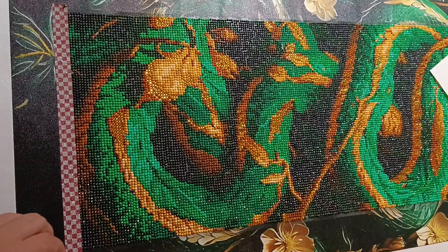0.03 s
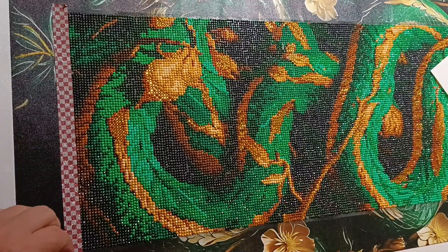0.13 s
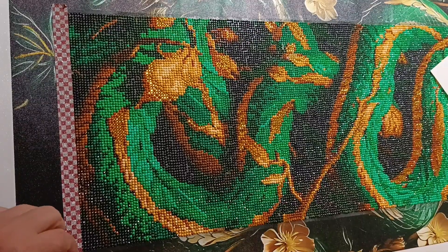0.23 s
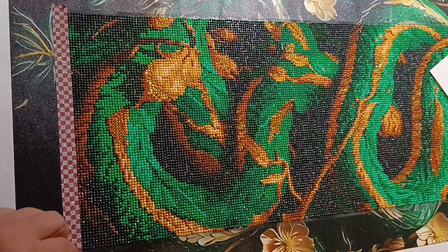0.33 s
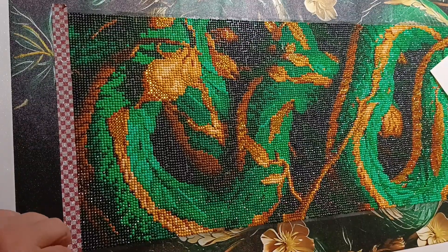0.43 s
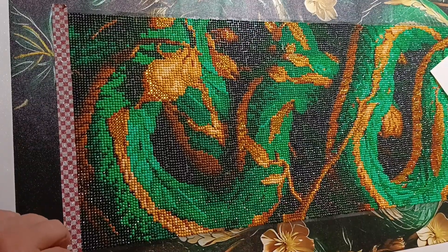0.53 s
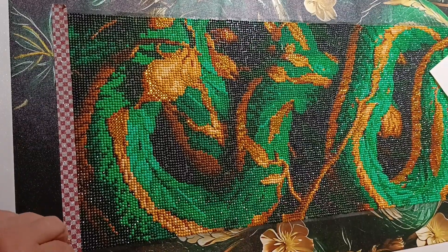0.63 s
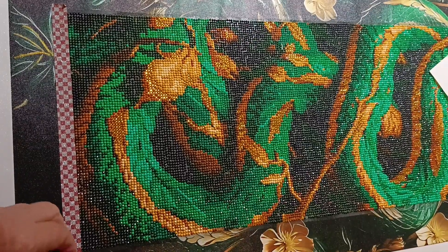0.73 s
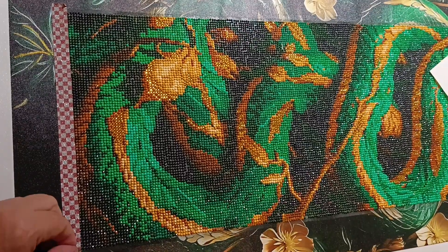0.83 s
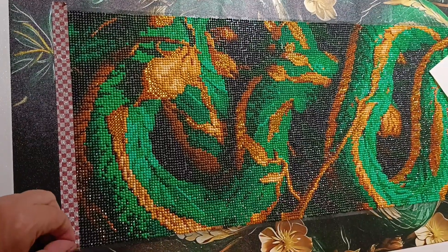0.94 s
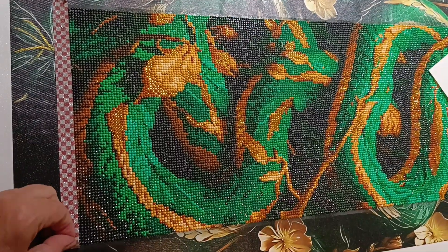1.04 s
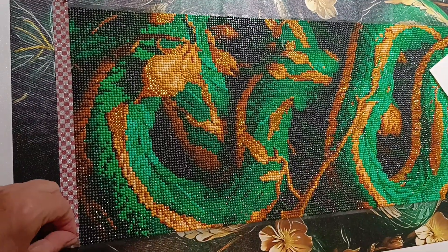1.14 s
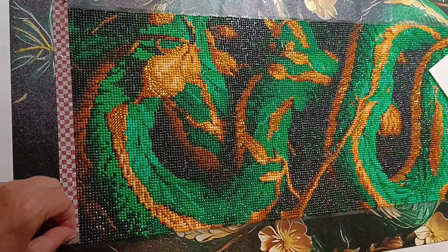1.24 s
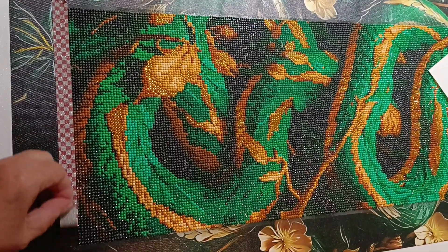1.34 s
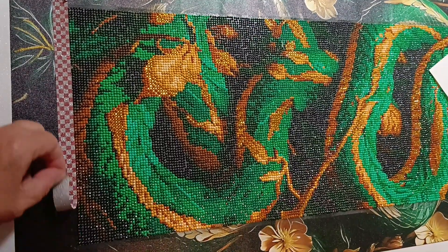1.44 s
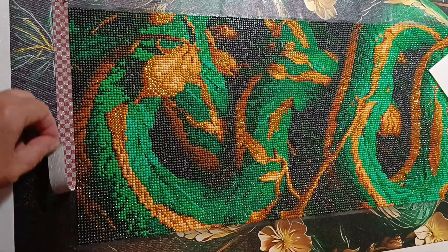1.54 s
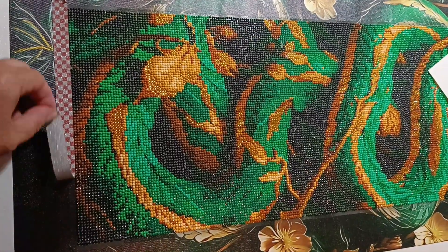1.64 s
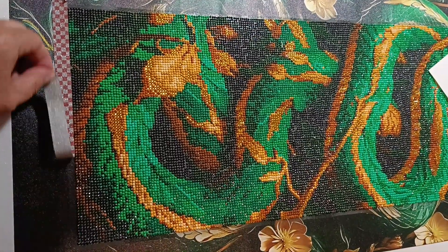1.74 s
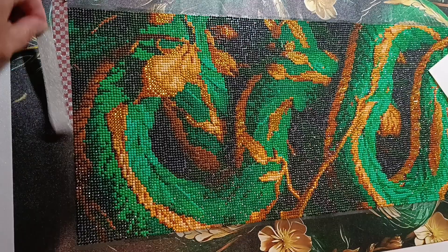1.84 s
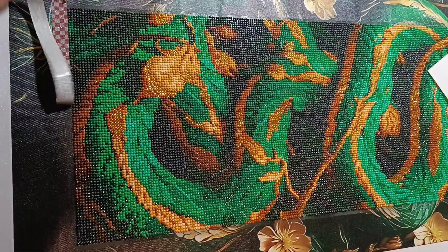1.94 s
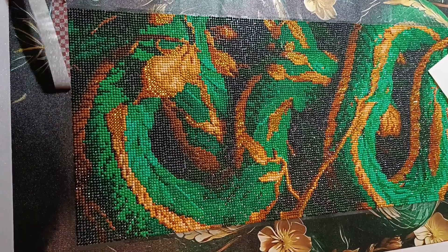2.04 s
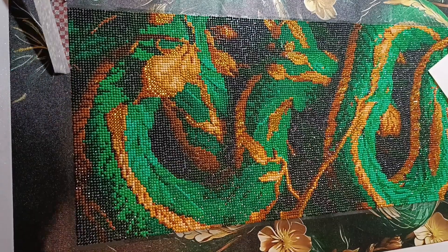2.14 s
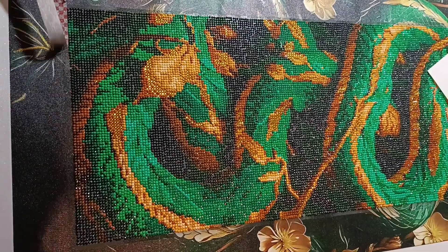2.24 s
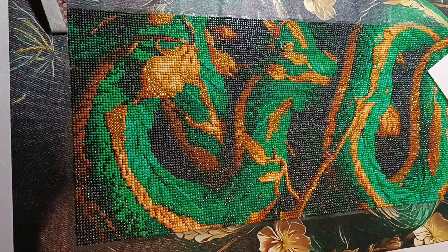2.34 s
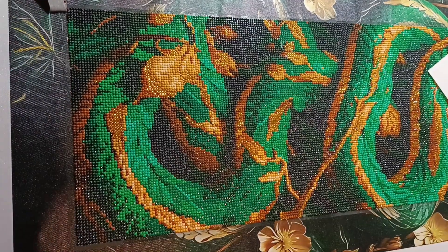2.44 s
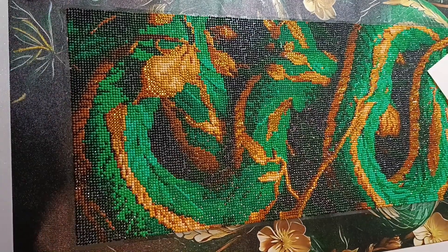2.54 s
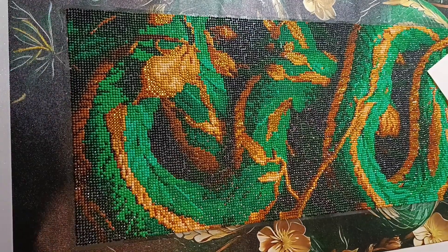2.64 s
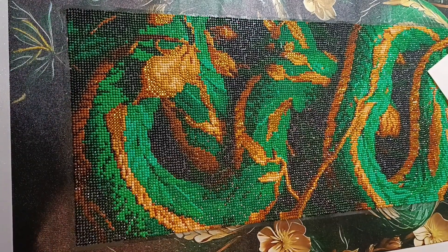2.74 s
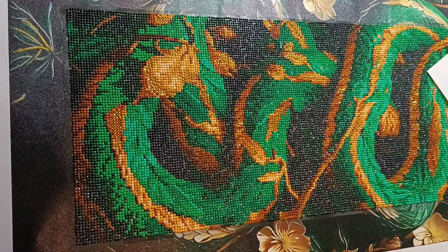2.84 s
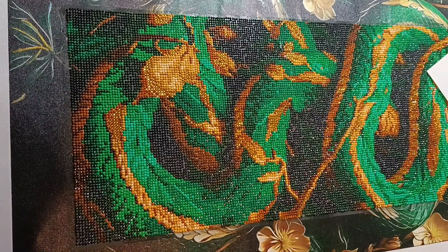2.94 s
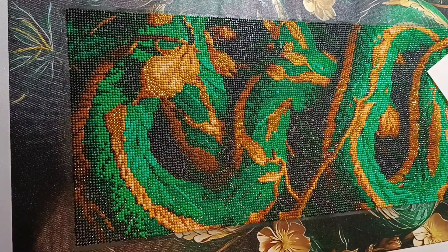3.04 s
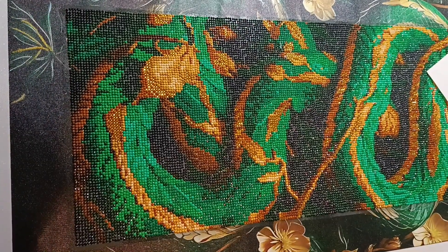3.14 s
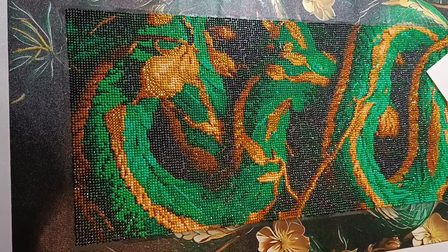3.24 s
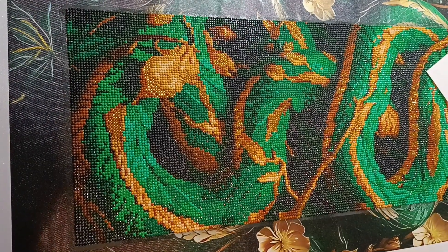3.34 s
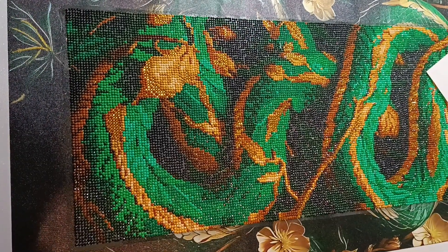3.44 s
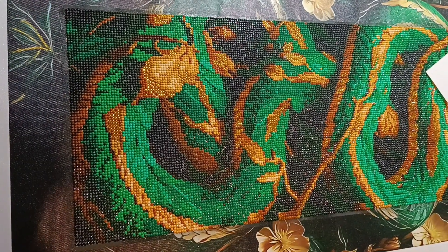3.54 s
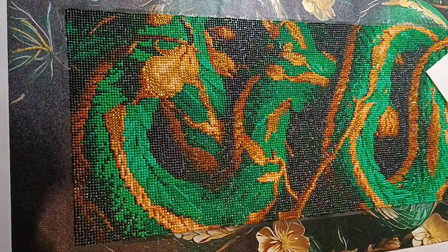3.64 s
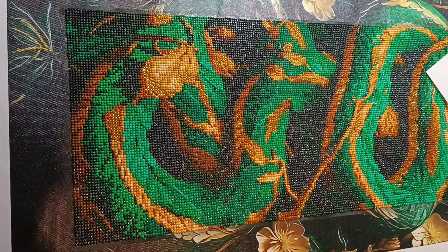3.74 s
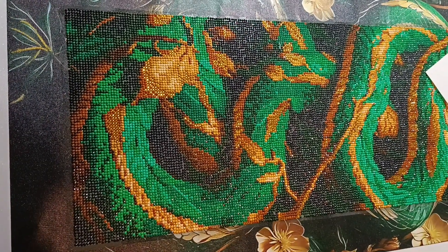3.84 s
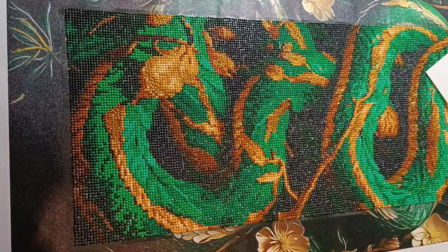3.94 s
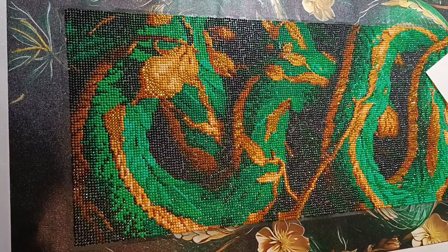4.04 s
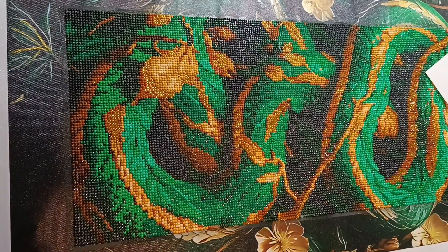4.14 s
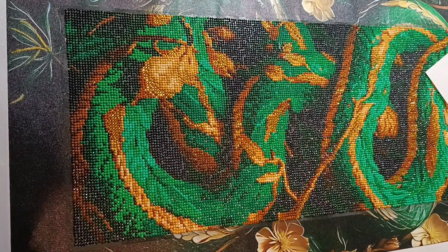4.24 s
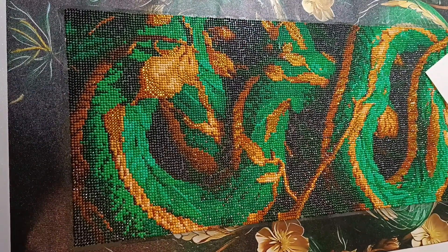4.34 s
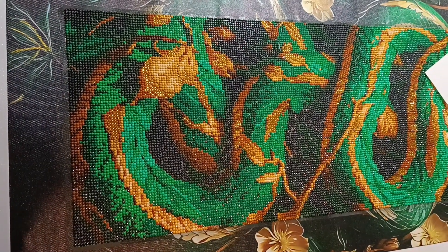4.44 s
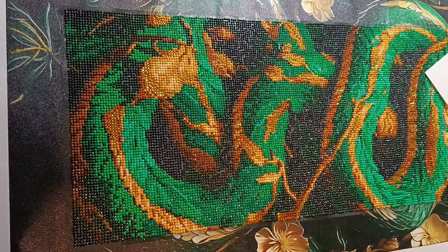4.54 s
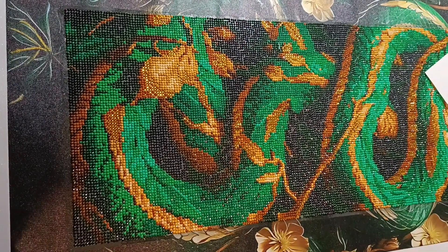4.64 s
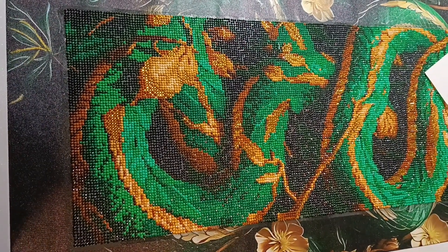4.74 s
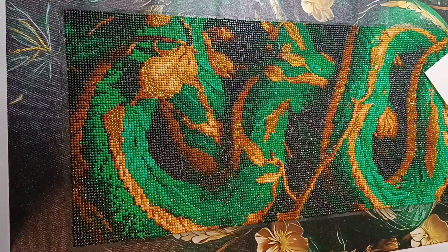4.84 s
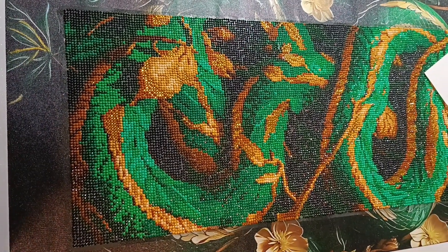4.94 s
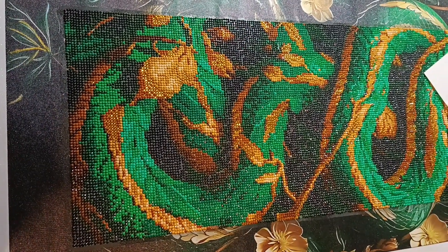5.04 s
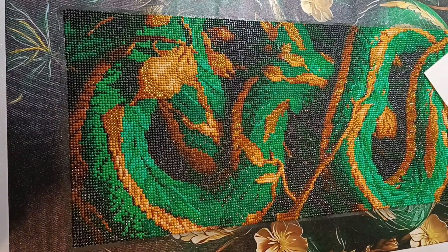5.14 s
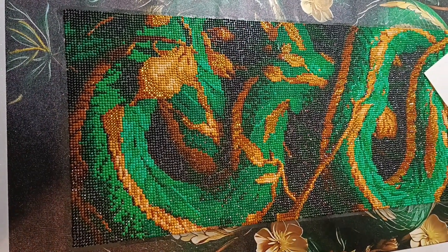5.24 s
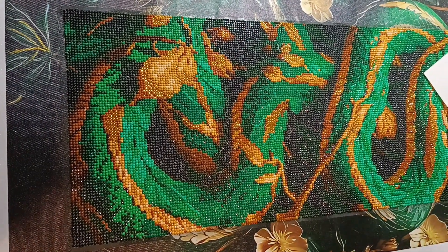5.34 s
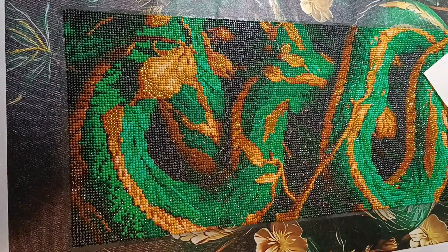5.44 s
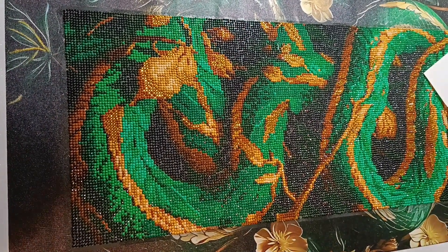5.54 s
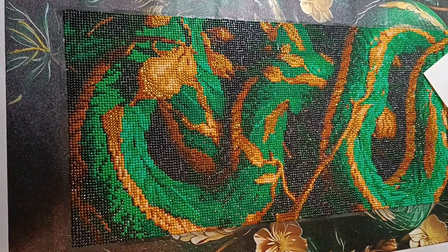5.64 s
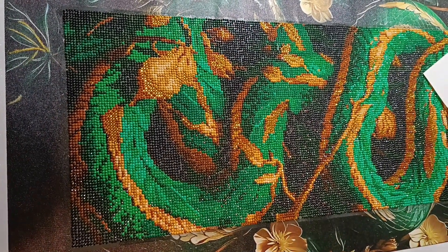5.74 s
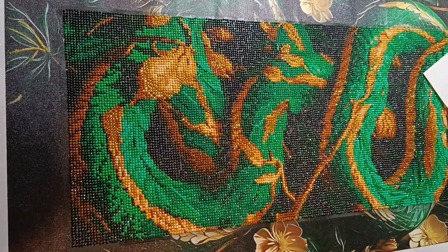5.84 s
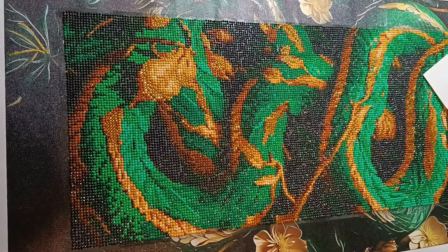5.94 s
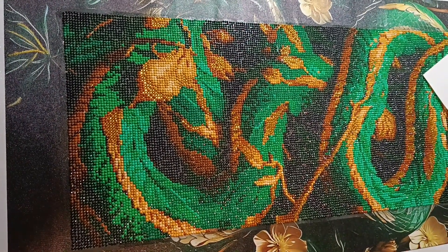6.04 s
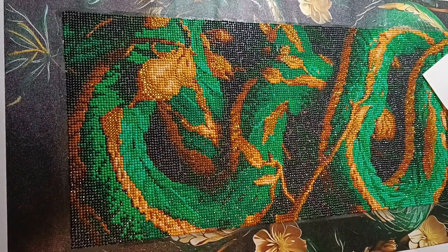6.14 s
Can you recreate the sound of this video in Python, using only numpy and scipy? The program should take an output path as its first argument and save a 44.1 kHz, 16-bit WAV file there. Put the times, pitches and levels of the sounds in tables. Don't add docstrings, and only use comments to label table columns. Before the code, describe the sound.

Close, crisp snaps of sticky tape peeling in bursts, followed by faint papery squeezing, a couple of dull table thumps and one small plastic click.

```python
import sys
import numpy as np
from scipy import signal
from scipy.fft import rfft, irfft, next_fast_len
from scipy.io import wavfile
from scipy.ndimage import uniform_filter1d

SR = 44100
rng = np.random.default_rng(int(sys.argv[2]) if len(sys.argv) > 2 else 0)


def boost_factor(decibels):
    exponent = np.asarray(decibels, float) / 20
    return 10 ** exponent


def pcm_store(signal):
    levels = np.round(np.clip(np.atleast_2d(signal), -1, 1) * 32767)
    wavfile.write(sys.argv[1], SR, levels.astype(np.int16).T)


N = 272524
FAST = 2 * next_fast_len(N // 2 + 64)
PORT_LAG_S = 10 / SR

# [t/s, length/s, level/dB, loudest point/0-1]
PULLS = [(0.045, 0.21, -64.5, 0), (0.733, 0.21, -59, 0.13), (0.924, .12, -57, .43),
         (1.086, 0.12, -57.5, 0.2), (1.217, 0.065, -44.5, 0.9), (1.258, .1, -37.5, 0.2),
         (1.7, .024, -41.5, 0.3), (1.803, .014, -41.5, .2), (1.84, 0.045, -32, 0.34),
         (1.95, 0.066, -56.5, 0.3), (2.007, 0.028, -44.5, 0.27), (2.064, .056, -56, .6),
         (2.129, .037, -37, 0.9), (2.172, 0.092, -40.5, 0.12), (2.362, 0.037, -30.5, 0.66),
         (2.453, 0.036, -30.5, 0.8), (2.507, 0.031, -42, 0), (2.677, 0.033, -35, 0.04),
         (2.769, 0.055, -45, 0.3)]
# [t/s, length/s, level/dB, extra papery share/dB]
SQUEEZES = [(3.418, 0.063, -53, -7), (3.473, 0.11, -55, -2), (3.649, 0.044, -54, -1),
            (3.723, 0.052, -50.5, -1), (3.779, 0.039, -52, -8), (3.858, 0.1, -51, -5),
            (3.95, 0.062, -53.5, -5), (4.1, 0.088, -56, -12), (4.165, 0.085, -49.5, -7),
            (4.361, 0.065, -52.5, -4.5), (4.498, .058, -61, -10), (4.594, .09, -47, -11.5),
            (4.689, 0.046, -55, -5), (4.78, .1, -50.5, -3.5), (4.916, 0.055, -58.5, -3),
            (4.954, 0.021, -50.5, 2)]
SQUEEZE_TOP = 0.33
# [t/s, length/s, level/dB, loudest point/0-1, extra papery share/dB]
STROKES = [(*pull, 0) for pull in PULLS]
STROKES += [(s, length_s, db, SQUEEZE_TOP, paper_db) for s, length_s, db, paper_db in SQUEEZES]


def snaps():
    pan_spread_db = 6
    out, t = np.zeros((2, N)), np.arange(512) / SR
    rows = releases()
    envelope = np.minimum(t / .0002, 1) * np.exp(-t / .00035)
    envelope += .4 * (t > .0012) * np.exp(-t / .0013)
    for (s, db, hz, ring_db), noise in zip(rows, rng.standard_normal((len(rows), len(t)))):
        spectrum = rfft(noise * envelope)
        burst = irfft(spectrum / np.sqrt(uniform_filter1d(np.abs(spectrum) ** 2, size=9)))
        crack = band(burst, 4830, 14000)
        shoulder = band(burst, 0.7 * hz, max(1.34 * hz, 5500))
        tape = unit(ring(burst, hz, 0.0026)) + 0.55 * unit(shoulder)
        tape = band(tape, min(0.81 * hz, 2200), 7800, order=3)
        snap = unit(crack) + boost_factor(ring_db + 3.0) * unit(tape)
        snap = snap / np.sqrt(uniform_filter1d(snap ** 2, size=31).max())
        heard = nearby(boost_factor(db - 8.5) * snap, noise[-48:].reshape(2, -1))
        add(out, s, panned(heard, pan_spread_db * noise[-49]))
    return out


def releases():
    # [t/s, level/dB]
    lift = [(0.0638, -35.5), (.2732, -45), (0.4985, -46.5), (0.544, -42), (.758, -45), (0.7685, -39),
            (.7848, -45), (.8293, -45), (0.8492, -33), (0.9865, -28), (1.0941, -36), (1.1126, -30.5),
            (1.1335, -25.5), (1.143, -32), (1.1794, -37), (1.2219, -30), (1.2317, -21.5), (1.2348, -19.5),
            (1.2634, -14), (1.2698, -19), (1.2813, -6), (1.2946, -10.5), (1.3043, -8.5), (1.3115, -9.5),
            (1.3166, -12), (1.3373, -16), (1.3433, -10)]
    # [t/s, level/dB]
    peel = [(1.7038, -20), (1.7092, -41), (1.8065, -23), (1.813, -23), (1.841, -15), (1.8472, -9.5),
            (1.8558, -3), (1.968, -30), (2.0132, -20.5), (2.0676, -28.5), (2.0814, -24.5), (2.095, -29),
            (2.1093, -23), (2.1274, -15), (2.1391, -14), (2.1598, -19.5), (2.1713, -9), (2.1768, -4.5),
            (2.2103, -13.5), (2.2157, -13.5), (2.3617, -11.5), (2.382, -8), (2.4538, -18), (2.4632, -14),
            (2.4725, -6), (2.505, -13.5), (2.5205, -11.5), (2.677, -29), (2.6881, -20.5), (2.7727, -33)]
    # [t/s, level/dB]
    creases = [(3.3202, -37.5), (3.4322, -30.5), (3.6654, -42), (3.7462, -33), (3.7952, -35.5),
               (3.589, -43.5), (4.2668, -42.5), (4.5005, -42), (4.781, -39), (4.9214, -37.5),
               (4.7583, -37.5), (4.7962, -24.5), (4.929, -37), (4.9662, -25)]
    # [t/s, level/dB]
    nails = [
        (4.0067, -26.5),
        (4.2965, -30),
    ]
    nail_hz, nail_ring_db = 3100, 18
    lesser_db, lesser_spread_db = 8, 3.5
    lesser = []
    for s, length_s, db, top, _ in STROKES:
        snap_s = s + (top + rng.random()) / 2 * length_s
        lesser.append((snap_s, db + lesser_db + lesser_spread_db * rng.standard_normal()))
    rows = [(s, db, *tape_at(s)) for s, db in [*lift, *peel, *creases, *lesser]]
    return rows + [(s, db, nail_hz, nail_ring_db) for s, db in nails]


def rustle():
    pan_db, all_paper_db = -8, -1.5
    sizes = (rng.random(N) < 1500 / SR) * boost_factor(3.5 * rng.exponential(size=N))
    grain = signal.lfilter([1], [1, -np.exp(-1 / (0.0018 * SR))], sizes) + 0.46
    grain = grain * rng.standard_normal(N) * boost_factor(1.65 * walk(60))
    crisp = unit(band(grain, 5900, 17030))
    out = np.zeros((2, N))
    scatter = rng.standard_normal((len(STROKES), 2, 24))
    for (s, length_s, db, top, paper_db), taps in zip(STROKES, scatter):
        u = np.linspace(0, 1, int(1.106 * length_s * SR))
        span = slice(int(s * SR), int(s * SR) + len(u))
        swell = np.sin(np.pi / 2 * np.interp(u, [0, np.clip(top, .05, .9), 1], [0, 1, 0]))
        hz, ring_db = tape_at(s + u * length_s)
        lo_hz, hi_hz = min(0.73 * hz.mean(), 2300), max(1.34 * hz.mean(), 4500)
        paper = unit(band(grain[span], lo_hz, hi_hz, order=3))
        stroke = boost_factor(db) * swell * (crisp[span] + boost_factor(all_paper_db + paper_db + ring_db) * paper)
        add(out, s, panned(nearby(stroke, taps), pan_db))
    return out


def tape_at(s):
    # [t/s, ring f/Hz, papery ring over crisp crack/dB]
    free_end = [(.9, 3520, -2.5), (.97, 2510, 5.5), (1.12, 2950, -2.5), (1.17, 2500, -3), (1.22, 2280, 8.5),
                (1.31, 2680, 6.5), (1.343, 3880, 0), (1.7, 7200, -8), (2.02, 6350, -5.5),
                (2.13, 5100, -0.5), (2.175, 4300, 6), (2.23, 4960, -1.5), (2.36, 6860, -2.5),
                (2.475, 6750, -4), (2.505, 3780, 10), (2.68, 3600, -3.5), (2.8, 3720, -2), (3.4, 6700, 0)]
    times, hz, ring_db = np.transpose(free_end)
    return np.interp(s, times, hz), np.interp(s, times, ring_db)


def nearby(x, taps):
    share = .45
    paths = share * taps * np.exp(-np.arange(taps.shape[1]) / 8)
    paths[:, 0] = 1
    return signal.fftconvolve(x[None], paths / np.linalg.norm(paths, axis=1, keepdims=True), axes=1)


def knocks():
    # [t/s, peak level/dB, slap level/dB, contact/s]
    hand = [(0.271, -44.5, -20, 0.0011), (0.539, -44, -17, 0.0012), (0.671, -37, -8, 0.0017),
            (0.999, -44, 4, 0.0024), (1.279, -47, 12, 0.0036), (1.88, -46.5, 8, 0.0029),
            (2.2, -41, 6.5, 0.0019), (2.499, -37.5, 1, 0.0026), (3.167, -45, -14, 0.0012),
            (3.502, -50.5, 6, 0.0021), (4.004, -26, -10, 0.0023), (4.296, -40.5, 1, 0.0022),
            (4.451, -62, -11, 0.0028), (4.649, -30.5, -2, 0.0015), (4.663, -19.5, -9, 0.0025),
            (4.799, -37.5, -7, 0.0031), (4.891, -39.5, -23, 0.0026)]
    # [f/Hz, level/dB, t60/s]
    table_modes = [(113.2, -1, 0.29), (184.9, -6, 0.29), (246.7, 0.5, .2), (309, -5.5, .2),
                   (398.2, 4, 0.17), (435, -1.5, .14), (566, -3, .12), (840, -2.5, .13)]
    out, t = np.zeros(N), np.arange(SR // 3) / SR
    chance = rng.standard_normal((len(hand), len(t)))
    for (s, db, slap_db, contact_s), noise in zip(hand, chance):
        push = np.sin(np.pi * np.minimum(t / max(contact_s, .0005), 1)) * (1 + .5 * noise)
        push += 0.17 * noise * np.exp(-t / 0.008)
        thud = 0
        for k, (hz, mode_db, t60) in enumerate(table_modes):
            spot_db = 1.5 * noise[-k - 1]
            thud = thud + boost_factor(mode_db + spot_db) * ring(push, hz, t60)
        thud = band(thud, 105, 1650)
        slap = band(noise, 600, 3010) * np.exp(-t / 0.015) * np.minimum(t / 0.0028, 1)
        knock = thud / np.abs(thud).max() + boost_factor(slap_db) * slap / np.abs(slap).max()
        add(out, s, boost_factor(db) * knock)
    return out


def pen():
    # [f/Hz, level/dB, t60/s]
    pen_modes = [(743, -17, .03), (1086, -12, 0.0092), (1630, -2, 0.015), (2040, -0.5, .01),
                 (2500, -6, 0.021), (2910, 8.5, 0.011), (3600, 1.5, .01), (4580, -4, 0.007)]
    pen_s, pen_db = 5.401, -30
    out, t = np.zeros(N), np.arange(SR // 4) / SR
    tick = rng.standard_normal(len(t)) * np.minimum(t / 0.0022, 1)
    tick = tick * (np.exp(-t / 0.0025) + 0.27 * np.exp(-t / 0.011))
    body = sum(boost_factor(db) * ring(tick, hz, t60) for hz, db, t60 in pen_modes)
    body = band(body, 600, 6800)
    add(out, pen_s, boost_factor(pen_db) * body / np.abs(body).max())
    return out


def creak():
    # [t/s, f/Hz, level/dB]
    joint = [
        (3.1, 293.5, -78.5),
        (3.106, 296.4, -72.5),
        (3.164, 305, -55.5),
        (3.352, 307.2, -55),
        (3.398, 286, -58.5),
        (3.424, 272.2, -72),
        (3.45, 280, -73),
    ]
    hz, db = curves(joint)
    t = np.arange(N) / SR
    on = uniform_filter1d(1. * (t > joint[0][0]) * (t < joint[-1][0]), 1500)
    grip = walk(30)
    phase = 2 * np.pi * np.cumsum(hz * (1 + .02 * grip)) / SR
    return on * boost_factor(db + 3.0 * grip) * np.sin(phase)


def echoes(x, db):
    # [f/Hz, t60/s]
    wash_t60 = [(500, 0.29), (2000, 0.2), (5000, 0.17), (12000, 0.12)]
    t = np.arange(SR // 3) / SR
    noise, tail = rfft(rng.standard_normal((3, len(t)))), 0
    for hz in 125 * 2. ** np.arange(8):
        like = np.clip(900 / hz, 0, .95)
        pair = np.sqrt(like) * noise[0] + np.sqrt(1 - like) * noise[1:]
        tail = tail + octave(pair, hz) * boost_factor(-60 * t / at(wash_t60, hz))
    tail = tail * np.minimum(t / .003, 1)
    return boost_factor(db) * signal.fftconvolve(x[None], tail / np.sqrt(np.sum(tail ** 2) / 2), axes=1)[:, :N]


def whistle():
    # [start t/s, end t/s, f/Hz, width/Hz, level/dB]
    gap = (5.52, 6.0, 6080, 300, -80)
    start_s, end_s, hz, width_hz, db = gap
    u = np.clip((np.arange(N) / SR - start_s) / (end_s - start_s), 0, 1)
    hiss = band(rng.standard_normal((2, N)), hz - width_hz / 2, hz + width_hz / 2)
    return boost_factor(db) * np.sin(np.pi * u) ** .5 * unit(hiss)


def room(shake):
    # [t/s, rumble level/dB]
    stir = [(0, -62.5), (.14, -54.5), (.57, -56.5), (1.2, -58), (1.46, -59.5), (2.6, -59), (3.05, -56),
            (3.39, -55.5), (4.03, -59), (4.2, -57.5), (4.8, -54), (5.18, -62), (5.42, -61), (5.61, -55.5),
            (5.8, -55.5), (6.02, -58.5), (6.18, -62)]
    # [f/Hz, level per Hz/dB]
    colour = [(25, -31), (38, -11), (60, -12), (85, -4), (120, -2), (300, -2.5), (500, -11.5),
              (1000, -13.5), (2500, -12), (4000, -21.5), (6000, -29), (9000, -39.5), (13000, -34),
              (16000, -33.5)]
    # [f/Hz, share/0-1]
    likeness = [(60, 0.4), (200, 0.35), (500, 0.32), (1500, 0.27), (3000, 0.22), (8000, 0)]
    hiss_db, mains_hz, mains_db = -71, 49, -72.5
    air_db, air_follows = -61.5, 0.75
    shake_rumble_db, shake_air_db = -21.5, -17.5
    rumble_db, = curves(stir)
    rumble = np.hypot(boost_factor(rumble_db), boost_factor(shake_rumble_db) * shake)
    air = np.hypot(boost_factor(air_db + air_follows * (rumble_db + 57)), boost_factor(shake_air_db) * shake)

    hz = np.maximum(np.fft.rfftfreq(FAST, 1 / SR), 1)
    common, own = rfft(rng.standard_normal(FAST)), rfft(rng.standard_normal((2, FAST)))
    like = np.clip(at(likeness, hz), 0, 1)
    both = common * np.exp(-2j * np.pi * hz * PORT_LAG_S * 0.74 * np.array([[0], [1]]))
    noise = (np.sqrt(like) * both + np.sqrt(1 - like) * own) * boost_factor(at(colour, hz))
    layers = np.zeros((3, 2, N))
    for centre in 30 * 2. ** np.arange(10):
        flicker_db = 2.6 if centre < 600 else 1.
        layer = int(centre > 600) + int(centre > 5000)
        layers[layer] += octave(noise, centre)[:, :N] * boost_factor(flicker_db * walk(14))
    hum = 2 ** .5 * boost_factor(mains_db) * np.sin(2 * np.pi * mains_hz * np.arange(N) / SR)
    return hum + sum(unit(x) * gain * boost_factor(3.0) for x, gain in zip(layers, (rumble, air, boost_factor(hiss_db))))


def ports(pair):
    # [f/Hz, left minus right level/dB]
    shading = [(1000, 0), (4000, 0), (7500, 2), (10500, 9), (14000, 13)]
    hz = np.maximum(np.fft.rfftfreq(FAST, 1 / SR), 1)
    tilt = boost_factor(at(shading, hz) / 2)
    return irfft(rfft(pair, FAST) * [tilt, np.exp(-2j * np.pi * hz * PORT_LAG_S) / tilt])[:, :N]


def unit(x):
    return x / np.sqrt(np.mean(x ** 2))


def curves(table):
    s, *columns = np.transpose(table)
    return [np.interp(np.arange(N) / SR, s, c) for c in columns]


def at(table, hz):
    table_hz, values = np.transpose(table)
    return np.interp(np.log(hz), np.log(table_hz), values)


def band(x, lo_hz, hi_hz, order=2):
    sos = signal.butter(order, [lo_hz, min(hi_hz, .48 * SR)], "band", fs=SR, output="sos")
    return signal.sosfilt(sos, x)


def octave(spectrum, centre_hz):
    hz = np.maximum(np.linspace(0, SR / 2, spectrum.shape[-1]), 1)
    return irfft(spectrum * np.cos(np.pi / 2 * np.clip(np.log2(hz / centre_hz), -1, 1)) ** 2)


def ring(x, hz, t60):
    pole = np.exp(2j * np.pi * hz / SR - np.log(1000) / (t60 * SR))
    return signal.lfilter([1], [1, -pole], x).imag


def walk(rate):
    k = int(SR / rate)
    held = np.repeat(rng.standard_normal(N // k + 1), k)
    return 1.3 * uniform_filter1d(uniform_filter1d(held, k), k)[:N]


def add(out, s, x):
    i = int(s * SR)
    out[..., i:i + x.shape[-1]] += x[..., :N - i]


def panned(x, pan_db):
    return x * boost_factor(np.array([pan_db, -pan_db]).reshape(2, -1) / 2)


def scene():
    tape = snaps() + rustle()
    tape = tape + echoes(tape.mean(axis=0), -5)
    shake = np.sqrt(uniform_filter1d(band(tape.mean(axis=0), 1900, 5500) ** 2, size=2500) + 1e-12)
    table = knocks() + creak()
    table = table + echoes(table, -8)
    tick = pen()
    tick = panned(tick, 4.8) + echoes(tick, -5.5)
    return ports(tape + table) + tick + room(shake) + whistle()


def band_limit(x):
    return signal.sosfilt(signal.butter(12, 17160, fs=SR, output="sos"), x)


def record(dry):
    top_hz = 15850
    mix = signal.sosfilt(signal.ellip(8, .2, 40, top_hz, fs=SR, output="sos"), dry)
    return band_limit(mix)


dry = scene()
out = record(dry)
pcm_store(out)
```